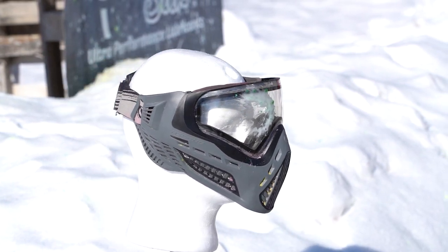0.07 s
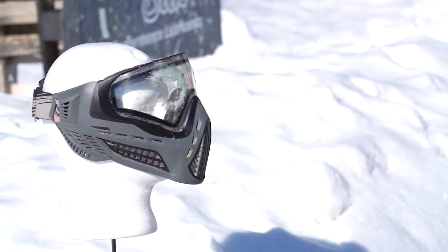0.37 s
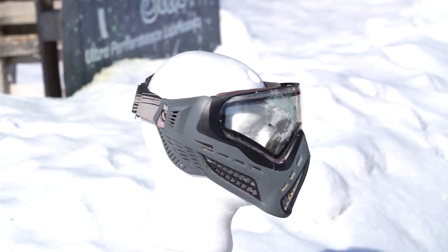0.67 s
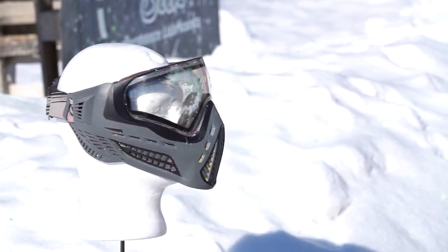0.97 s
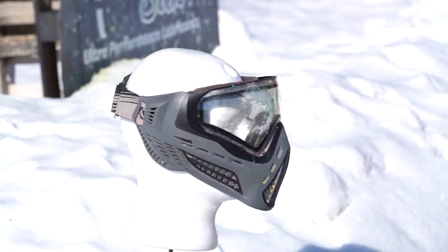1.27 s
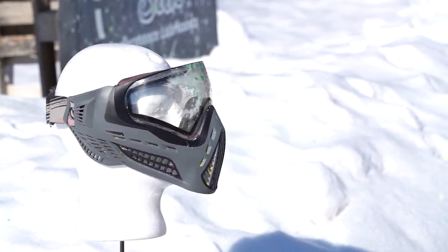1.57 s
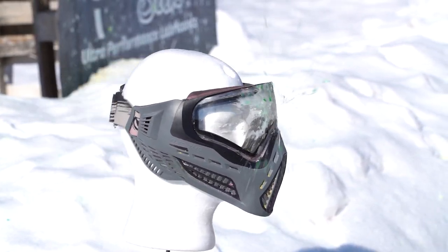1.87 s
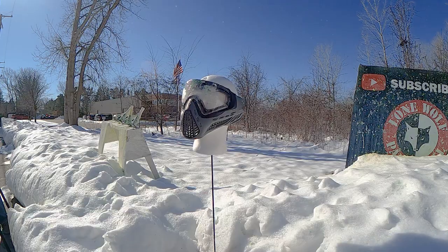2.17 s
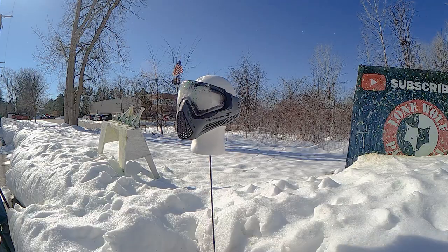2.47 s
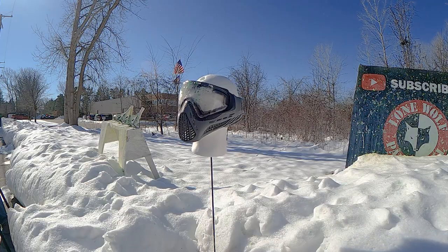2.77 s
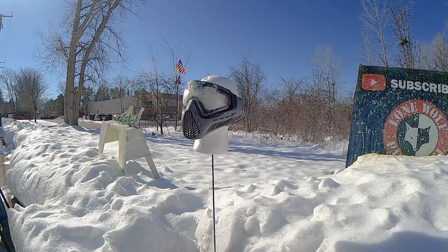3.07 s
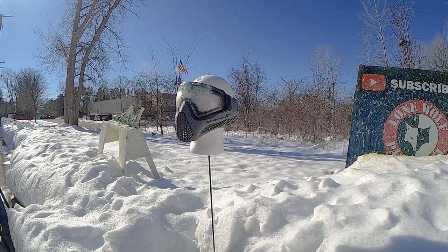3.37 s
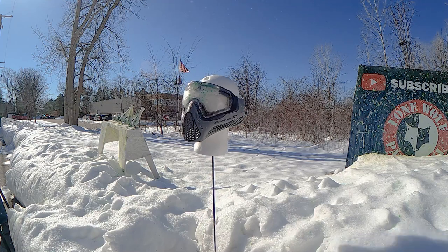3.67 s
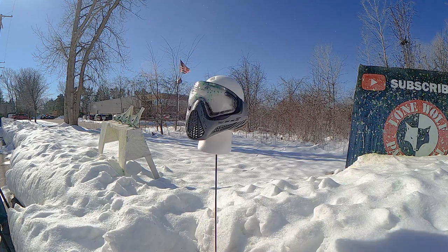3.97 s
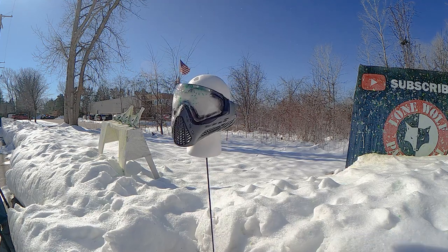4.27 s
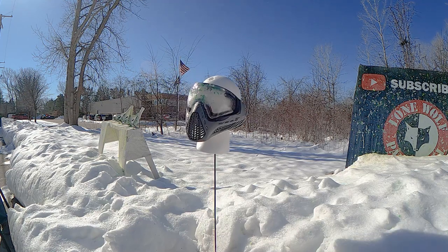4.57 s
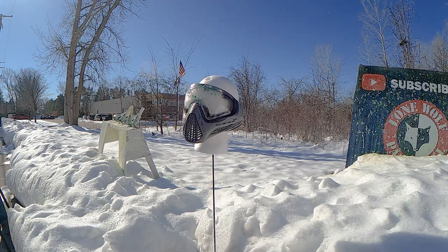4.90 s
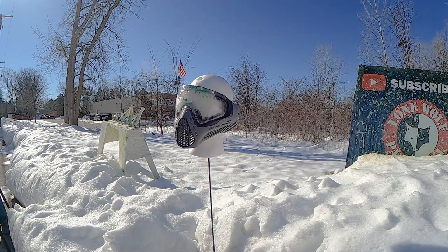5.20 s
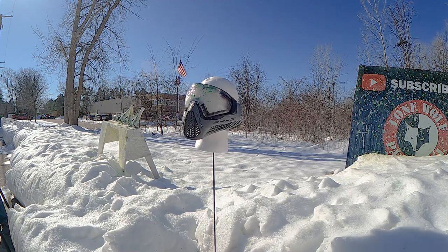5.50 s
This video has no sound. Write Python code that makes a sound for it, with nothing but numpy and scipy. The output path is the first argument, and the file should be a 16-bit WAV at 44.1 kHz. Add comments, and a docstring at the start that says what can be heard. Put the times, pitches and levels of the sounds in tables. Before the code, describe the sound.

In a quiet, snowy outdoor place with soft far traffic, a faint handling tick precedes a single paintball shot. About a second later a steady string of nine follows. Each gas pop runs straight into a wet crack on a face mask, with a small trigger click and a short echo. Well behind the prominent shots, a distant engine rises and eases, and two hits faintly ring the mask's steel stand.

```python
"""Far traffic rushes softly over a snowy field; after a faint tick of handling, a paintball marker fires.
The valve clicks, the bolt chirps, gas pops from the barrel, and the ball smacks a face mask on a stand.
Paint patters down, trees and boards answer, and the trigger resets. After another tick, nine more shots
follow, about two a second. Under them a distant engine picks up speed; two hits set the steel stand
ringing, and the engine eases off."""
import sys
import numpy as np
from scipy import signal
from scipy.fft import rfft, irfft, next_fast_len
from scipy.io import wavfile
from scipy.ndimage import map_coordinates

SR = 44100
rng = np.random.default_rng(int(sys.argv[2]) if len(sys.argv) > 2 else 0)


def put_to_file(sound):
    """Save the sound as 16-bit audio at rate SR, in the file named by the first command-line argument."""
    columns = np.atleast_2d(sound).T  # one column per channel
    safe = np.clip(columns, -1, 1)
    whole_steps = np.round(safe * 32767)
    wavfile.write(sys.argv[1], SR, whole_steps.astype(np.int16))


N = 253406
TIME = np.arange(N) / SR
AGE = np.arange(SR) / SR  # seconds since an event began


def amp(db):
    """Amplitude ratio of a level in decibels."""
    return 10 ** (np.asarray(db) / 20)


def unit(x):
    """Normalisation to rms 1."""
    return x / np.sqrt(np.mean(x ** 2) + 1e-20)


def along(points, hz):
    """Interpolation on a logarithmic frequency axis."""
    knots_hz, values = np.transpose(points)
    return np.interp(np.log(hz + 1), np.log(knots_hz + 1), values)


def filtered(x, response):
    """Filtering as multiplication of the spectrum by a frequency response."""
    size = next_fast_len(len(x) + 8192)
    return irfft(rfft(x, size) * response(np.fft.rfftfreq(size, 1 / SR)), size)[:len(x)]


def noise(spectrum, size=SR):
    """White noise shaped by a relative spectrum, at rms 1."""
    return unit(filtered(rng.standard_normal(size), lambda hz: amp(along(spectrum, hz))))


def wobble(rate_hz):
    """Smooth random modulation: a spline through rate_hz knots a second."""
    return map_coordinates(rng.standard_normal(int(N * rate_hz / SR) + 4), [TIME * rate_hz])


def fade(t60_s, start_s=0):
    """Exponential decay from a sudden onset, 60 dB in t60_s."""
    return (AGE >= start_s) * amp(-60 * np.maximum(AGE - start_s, 0) / t60_s)


def swell(peak_s, sharpness=1):
    """Gamma envelope: a rounded rise to 1 at peak_s and a longer fall."""
    return (AGE / peak_s * np.exp(1 - AGE / peak_s)) ** sharpness


def hold(length_s, t60_s):
    """Steady excitation, then free decay."""
    return np.where(AGE < length_s, 1, fade(t60_s, length_s))


def tone(hz, start_s=0):
    """Simple harmonic motion from zero phase."""
    return np.sin(2 * np.pi * hz * np.maximum(AGE - start_s, 0))


def add(track, start_s, sound):
    """Superposition of a sound on the track."""
    i = max(round(start_s * SR), 0)
    track[i:i + len(sound)] += sound[:len(track) - i]


# spectrum of far traffic: frequency_hz, level_db
TRAFFIC_SPECTRUM = [(25, -26), (55, -12.5), (76, -7), (100, -5), (290, -7.5), (430, -5.5), (600, -8),
                    (820, -5.5), (1100, -14.5), (1520, -28.5), (2200, -38), (3200, -47.5), (8000, -52),
                    (15000, -64.5)]
# its slow rise and fall: time_s, level_db
TRAFFIC_LEVEL = [(0.0, -52), (1.02, -55.5), (1.62, -53.5), (4.14, -49.5), (4.93, -52), (5.75, -50)]


def traffic():
    """Incoherent sources: far vehicles sum to a low, slowly varying noise."""
    level_db = np.interp(TIME, *np.transpose(TRAFFIC_LEVEL)) + 0.17 * wobble(3.6)
    return amp(level_db) * noise(TRAFFIC_SPECTRUM, size=N)


# ticks of handling: start_s, level_db
TICKS = [(0.066, -60), (0.781, -68.5)]
# spectrum of a tick: frequency_hz, level_db
TICK_SPECTRUM = [(200, -12), (1500, 5), (5000, -12), (14000, -30)]


def handling():
    """Impulsive excitation: light contacts give short bursts of noise."""
    out = np.zeros(N)
    for start_s, level_db in TICKS:
        add(out, start_s, amp(level_db) * noise(TICK_SPECTRUM) * fade(0.055))
    return out


# chirp of the sliding bolt: after_click_s, pitch_hz
BOLT_PITCH = [(0, 1416), (.003, 1315), (.007, 1054), (.012, 1090), (.016, 863)]
# resonances of the marker's body: frequency_hz, level_db
BODY_SPECTRUM = [(200, -17), (800, 9.5), (1700, -5.5), (2200, 7.5), (3000, -19), (4400, -2), (5300, 1.5),
                 (6600, -19.5), (9300, -22), (10500, -13.5), (11700, -34.5), (12700, -23), (15000, -39.5)]


def bolt(travel_s=.0138):
    """Impact and friction: the valve clicks, the bolt chirps along its seals and knocks at its stop."""
    click = amp(-9.5) * tone(720) * fade(0.0069) + amp(-18) * noise(BODY_SPECTRUM) * fade(0.0035)
    pitch_hz = np.interp(AGE, *np.transpose(BOLT_PITCH)) * (1 + 0.014 * rng.standard_normal())
    chirp = amp(-22.5) * np.sin(2 * np.pi * np.cumsum(pitch_hz) / SR)
    slide = (chirp + amp(-27.5) * noise(BODY_SPECTRUM)) * hold(travel_s, 0.025)
    knock = amp(-19) * tone(330, travel_s) * fade(0.0081, travel_s)
    clack = amp(-25) * noise(BODY_SPECTRUM) * fade(0.0093, travel_s)
    return click + slide + knock + clack


# modes of the barrel's air column: pitch_hz, level_db, peak_s
BARREL_MODES = [(373.7, -2, 0.0018), (125, -20.5, 0.0049), (327, -17.5, .007)]
# spectrum of the gas jet: frequency_hz, level_db
JET_SPECTRUM = [(200, -8), (900, 4.5), (1400, -3.5), (2400, 0), (3400, -3.5), (5000, -12), (7000, -12.5),
                (10500, -19), (12500, -26), (16000, -34)]


def pop(bounce_s=.0074, bounce_db=-3.5, snow_hz=1200, bend=3.11, bend_s=0.00054):
    """Air-column resonance and jet noise: gas rings the barrel and escapes; snow reflects the lows."""
    tuning = 1 + 0.015 * rng.standard_normal()
    # the column starts short and high, and drops in pitch as the ball runs down the barrel
    clock = tuning * (AGE + bend * bend_s * (1 - np.exp(-AGE / bend_s)))
    column = 0
    for k, (pitch_hz, level_db, peak_s) in enumerate(BARREL_MODES):
        mode = np.sin(2 * np.pi * pitch_hz * clock) * swell(peak_s, 1.24)
        column += (-1) ** k * amp(level_db + rng.normal(0, 1)) * mode
    blow_by = amp(-14) * np.exp(-((AGE - .0046) / 0.0012) ** 2)  # gas around the ball
    blast = amp(-11.5) * np.exp(-((AGE - .0072) / 0.001) ** 2)  # gas behind it
    sound = noise(JET_SPECTRUM) * (blow_by + blast + amp(-26.5) * hold(0.013, 0.017)) - column
    reflection = signal.lfilter(*signal.butter(1, snow_hz, fs=SR), sound)
    add(sound, bounce_s, amp(bounce_db) * reflection)
    return sound


# echoes off boards and a building: delay_s, level_db, t60_s
ECHOES = [(0.064, -45.5, 0.029), (.088, -50, .04), (.145, -43, 0.039), (.174, -46.5, .02)]
# spectrum of an echo: frequency_hz, level_db
ECHO_SPECTRUM = [(60, -14.5), (200, -4), (280, 7), (400, -23), (800, -1.5), (2200, -5.5), (5000, -17),
                 (12000, -26.5)]
# spectrum of the scatter from the trees: frequency_hz, level_db
SCATTER_SPECTRUM = [(60, -12.5), (280, 5.5), (500, 6), (900, -2), (1500, -3.5), (2200, -5), (3000, -18),
                    (4000, -13.5), (6000, -22.5), (10000, -30), (16000, -40.5)]
# decay time of that scatter: frequency_hz, t60_s
SCATTER_DECAY = [(150, 0.23), (1000, 0.57), (3000, 0.89), (6000, .58), (14000, 0.54)]


def field(burst, lag_s, scatter_db, build_s=.008):
    """Reflection and scattering: walls add distinct echoes, trees a diffuse tail."""
    response = np.zeros(SR)
    for delay_s, level_db, t60_s in ECHOES:
        echo = noise(ECHO_SPECTRUM) * fade(t60_s)
        add(response, delay_s, amp(level_db) * echo / np.linalg.norm(echo))
    heard = burst + signal.fftconvolve(burst, response)[:len(burst)]
    hz, age_s, bands = signal.stft(noise(SCATTER_SPECTRUM), SR, nperseg=256)
    decay = amp(-60 * age_s / along(SCATTER_DECAY, hz)[:, None])
    tail = signal.istft(bands * decay, SR, nperseg=256)[1][:SR]
    tail *= 1 - np.exp(-AGE / build_s)
    # the tail's energy is proportional to the burst's
    add(heard, lag_s, amp(scatter_db) * np.linalg.norm(burst) * tail / np.linalg.norm(tail))
    return heard


# modes of the mask's shell: pitch_hz, level_db, t60_s
MASK_MODES = [(265, -34, 0.014), (774, -22, 0.038), (1150, -9.5, 0.022), (1984, -17.5, 0.022),
              (3270, -21, 0.024)]
# spectrum of the bursting ball: frequency_hz, level_db
SPLAT_SPECTRUM = [(150, -17), (600, -4), (1100, 9), (1500, -5), (2100, 4.5), (3000, -3), (3800, 0),
                  (6000, -12), (10000, -17), (16000, -27)]


def smack(lens_hz, splat_db):
    """Damped modes struck by an impact: lens and mask ring as the ball cracks and its paint sprays."""
    lens = amp(-4) * tone(lens_hz) * swell(.001)
    mask = 0
    for pitch_hz, level_db, t60_s in MASK_MODES:
        mask += amp(level_db + rng.normal(0, 1.5)) * tone(pitch_hz * rng.normal(1, .025)) * fade(t60_s)
    crack = amp(2.5) * fade(0.0053)
    spray = amp(-7.5) * np.exp(-((AGE - .0043) / 0.00048) ** 2) + amp(-12) * fade(0.056)
    return amp(splat_db) * noise(SPLAT_SPECTRUM) * (crack + spray) - lens - mask


# spectrum of the paint drops: frequency_hz, level_db
DROP_SPECTRUM = [(1000, -5.5), (4000, 0), (8000, -5), (16000, -19.5)]


def drops(rate_hz=1200, spread_db=4):
    """Random small impacts merge into grainy noise: paint and bits of shell patter down and die away."""
    patter = unit(noise(DROP_SPECTRUM) * amp(spread_db * wobble(rate_hz)[:SR]))
    return amp(-50.5) * patter * fade(0.47)


# spectrum of air refilling the chamber: frequency_hz, level_db
REFILL_SPECTRUM = [(1000, -5), (3000, -2), (4200, 9), (6000, -1.5), (7500, 9.5), (8500, -2.5), (9600, 4),
                   (12000, -5.5), (16000, -24.5)]


def reset():
    """Impact and turbulence: the trigger ticks against its stop and air hisses into the chamber."""
    tick = (tone(4850) + .9 * tone(4350) + .5 * tone(3600)) * swell(.001)
    hiss = amp(-19.5) * noise(REFILL_SPECTRUM) * hold(0.016, 0.065)
    return tick / np.abs(tick).max() + hiss


# course of the distant engine: time_s, pitch_hz, level_db
ENGINE_COURSE = [(1.7, 112.1, -73.5), (2.1, 114, -59), (2.749, 122, -59.5), (3.3, 128.8, -47.5),
                 (4.85, 130.8, -52), (5.3, 125.7, -59.5), (5.75, 120.5, -54.5)]


def engine():
    """A periodic source: the hum rises in pitch as the engine picks up speed and falls as it eases."""
    time_s, pitch_hz, level_db = np.transpose(ENGINE_COURSE)
    wavering_hz = np.interp(TIME, time_s, pitch_hz) * (1 + .009 * wobble(14))
    gain = amp(np.interp(TIME, time_s, level_db) + 0.83 * wobble(17))
    return gain * np.sin(2 * np.pi * np.cumsum(wavering_hz) / SR)


# hits that ring the steel stand: start_s, level_db
STAND_RINGS = [(3.4625, -62), (3.9792, -54)]


def stand(pitch_hz=8005, t60_s=.33):
    """Free vibration: one lightly damped mode of the steel rings on after a hit."""
    out = np.zeros(N)
    for start_s, level_db in STAND_RINGS:
        add(out, start_s, amp(level_db) * tone(pitch_hz) * fade(t60_s))
    return out


# pulls of the trigger: start_s, lens_pitch_hz, splat_gain_db, held_s
SHOTS = [(.268, 1010, -7.5, 0.11), (1.36, 870, -10, 0.11), (1.9132, 853, -2, 0.1), (2.361, 980, -6, 0.1),
         (2.919, 1021, -6, .112), (3.4128, 974, -12, .112), (3.9303, 956, -8.5, .1042),
         (4.426, 905, -6.5, 0.1), (4.929, 873, -2.5, 0.11), (5.4416, 995, -8.5, .115)]


def scene(dwell_s=.0251, flight_s=.0246):
    """Superposition: over the background, each shot's click, pop, hit and reset follow in turn."""
    out = traffic() + handling()
    for start_s, lens_hz, splat_db, held_s in SHOTS:
        shot = amp(-0.44) * bolt()
        add(shot, dwell_s, amp(-0.85) * pop())
        add(out, start_s, field(shot, lag_s=dwell_s, scatter_db=-32))
        hit = field(smack(lens_hz, splat_db), lag_s=0, scatter_db=-27) + amp(splat_db) * drops()
        add(out, start_s + dwell_s + flight_s, hit)
        add(out, start_s + held_s, amp(-30.5) * reset())
    return (out + engine() + stand())[None]


def record(dry, low_cut_hz=65, ceiling=.72, top_hz=16000):
    """Band limiting and soft saturation: deep bass is shed, peaks are rounded, the top treble is cut."""
    lean = signal.lfilter(*signal.butter(2, low_cut_hz, "high", fs=SR), dry[0])
    rounded = lean / (1 + np.abs(lean / ceiling) ** 6) ** (1 / 6)
    return filtered(rounded, lambda hz: 1 / (1 + (hz / top_hz) ** 100))[None]


dry = scene()
out = record(dry)
put_to_file(out)
```